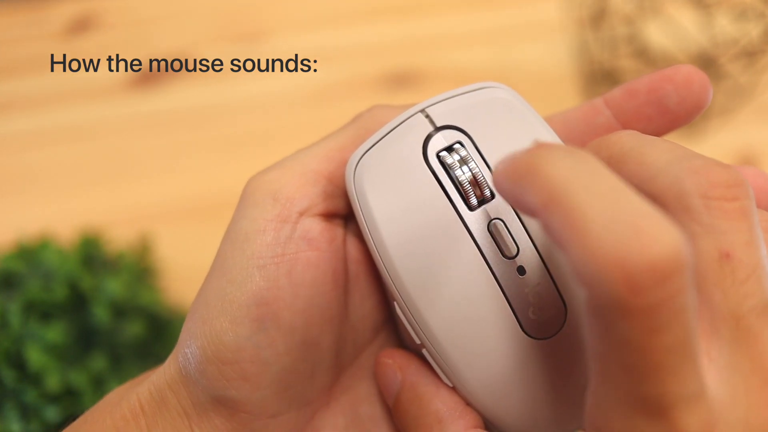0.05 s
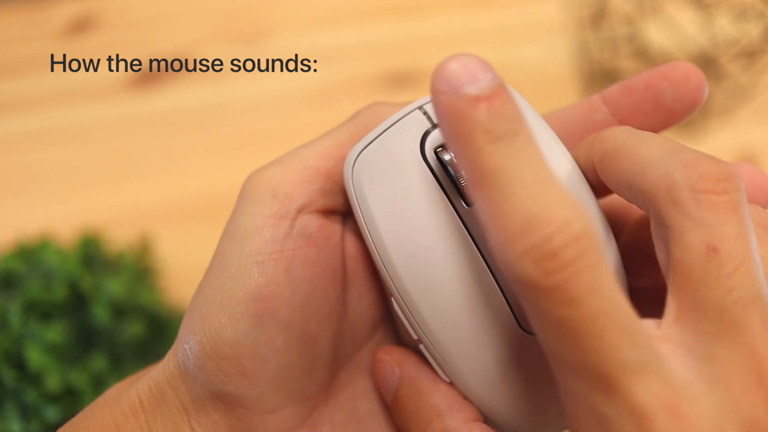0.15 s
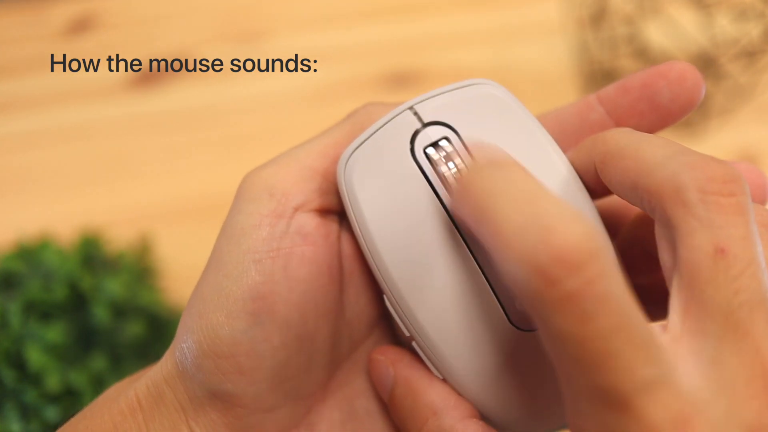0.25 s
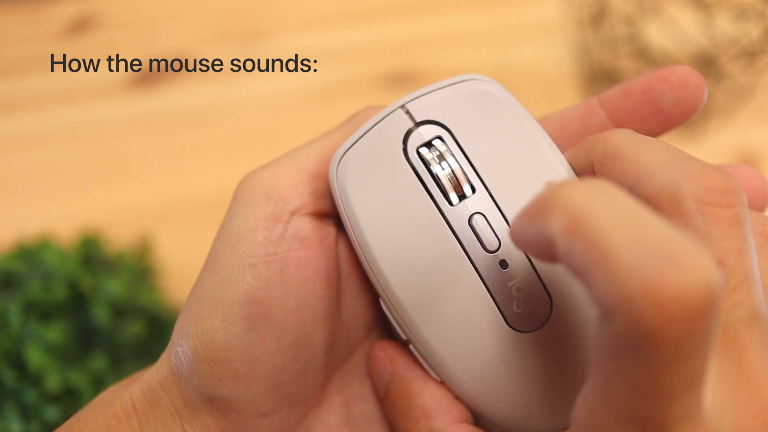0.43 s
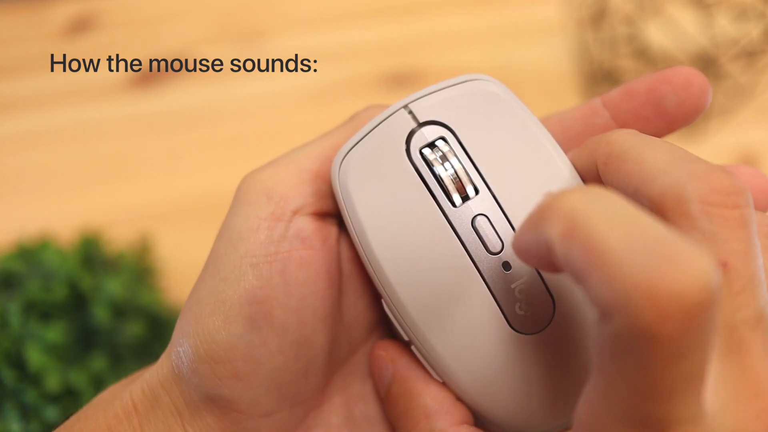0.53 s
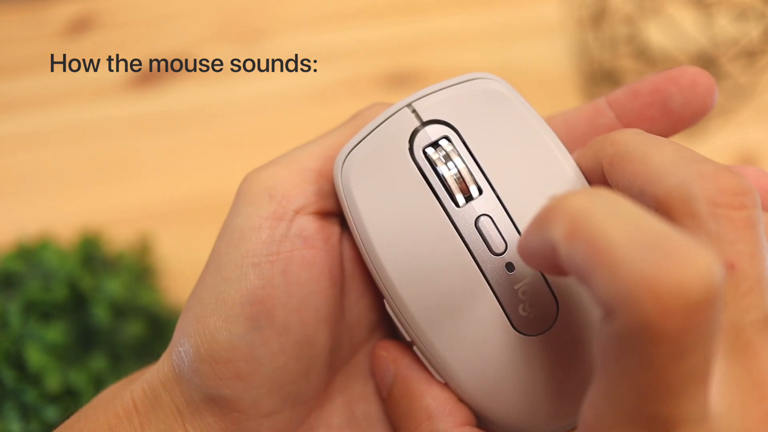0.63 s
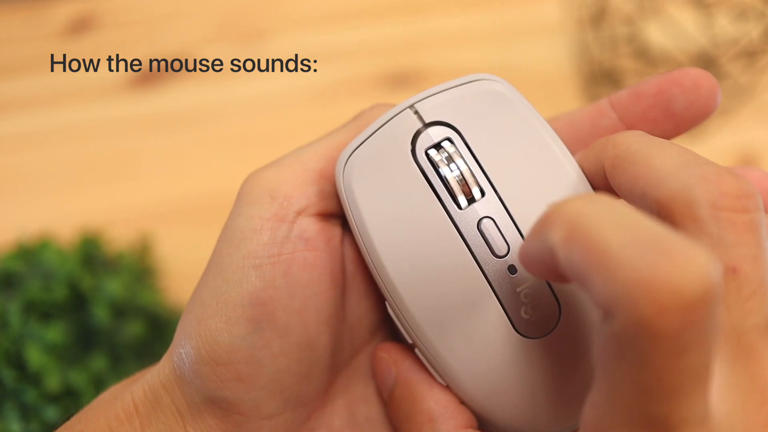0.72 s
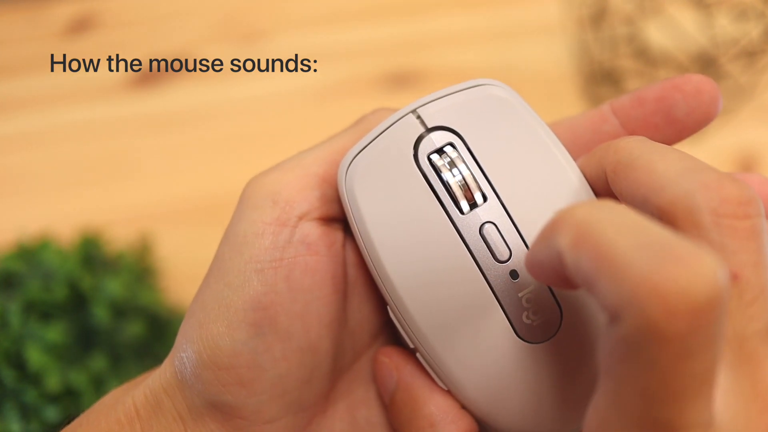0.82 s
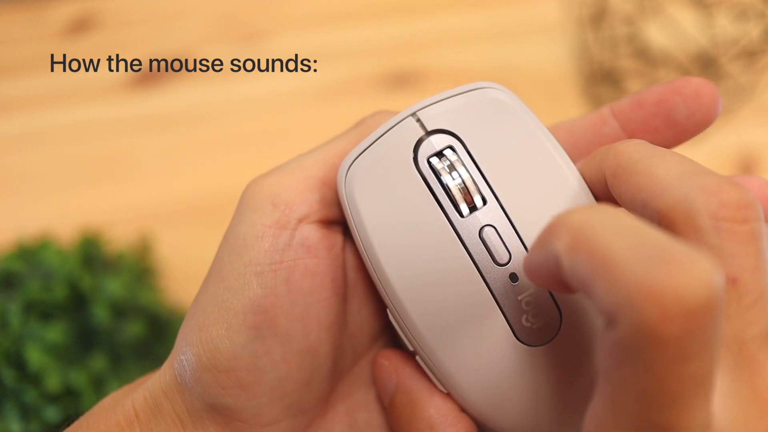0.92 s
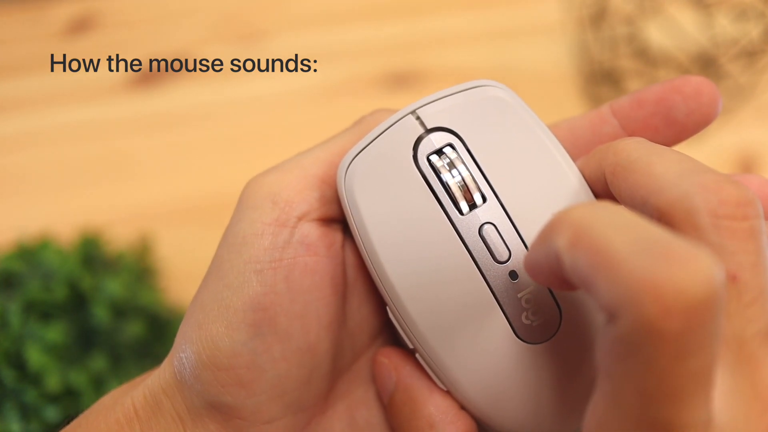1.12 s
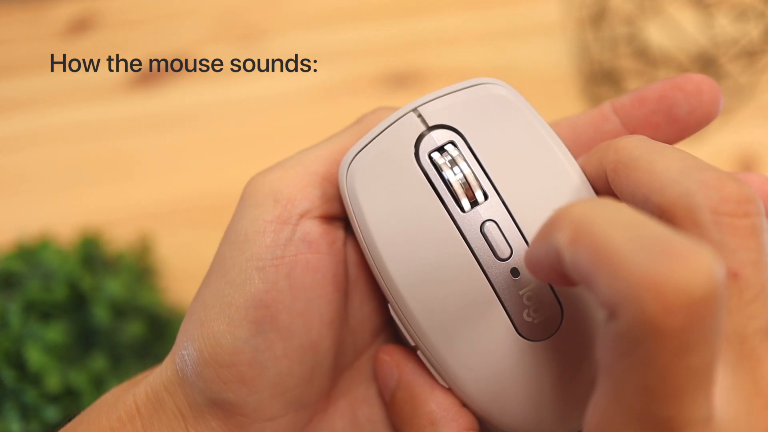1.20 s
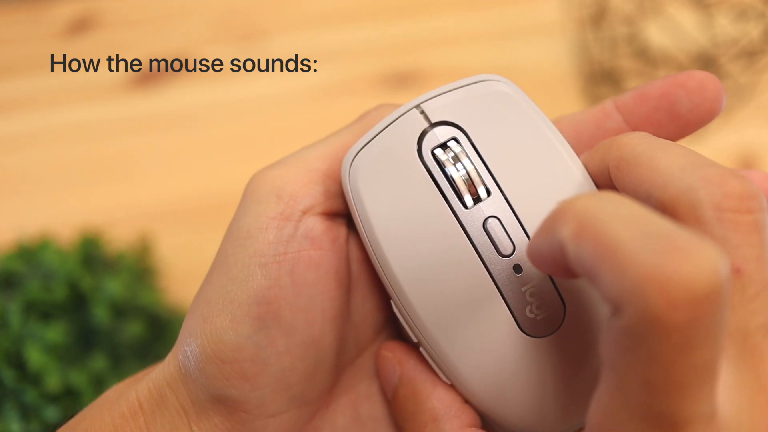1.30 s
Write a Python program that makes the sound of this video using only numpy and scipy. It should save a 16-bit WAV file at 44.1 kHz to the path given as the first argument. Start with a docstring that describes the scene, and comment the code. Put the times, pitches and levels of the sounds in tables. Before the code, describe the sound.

A computer mouse scroll wheel is flicked once, close to the microphone. At about 0.25 seconds it gives a sharp, plastic click, then another at 0.3 as it snaps free. The wheel spins on with a faint, pulsing whir that falls steadily in pitch and gets quieter at about 1.2 seconds. A faint low hum and the noise of a small, quiet room lie underneath.

```python
"""A flick of a mouse wheel

A finger flicks the metal scroll wheel of a hand-held mouse, close to the microphone in a small quiet
room. The wheel knocks in its cradle as it is pushed and again as it snaps free, ringing the plastic
shell. It spins on with a faint falling whir that throbs once a turn, over low mains hum and room noise."""
import sys
import numpy as np
from scipy import signal
from scipy.fft import rfft, irfft
from scipy.io import wavfile
from scipy.ndimage import uniform_filter1d

SR = 44100
rng = np.random.default_rng(int(sys.argv[2]) if len(sys.argv) > 2 else 0)


def waveform_to_disk(signal):
    """Save audio, clipped to [-1, 1], as 16-bit WAV at the path in sys.argv[1]."""
    frames = np.transpose(np.atleast_2d(signal))
    scaled = np.clip(frames, -1, 1) * 32767
    samples = np.round(scaled).astype(np.int16)
    wavfile.write(sys.argv[1], SR, samples)


N = 59535
T = np.arange(N) / SR
HZ = np.fft.rfftfreq(N, 1 / SR)


def from_db(db):
    """Decibels to gain."""
    return 10 ** (np.asarray(db) / 20)


def rms_one(x):
    """Scale to unit rms."""
    return x / np.sqrt(np.mean(x ** 2) + 1e-20)


def at_hz(points, hz):
    """Read a table on a log-frequency axis."""
    table_hz, value = np.transpose(points)
    return np.interp(np.log(np.maximum(hz, 1)), np.log(table_hz), value)


def noise(spectrum):
    """Steady noise of a given colour, rms 1."""
    return rms_one(irfft(rfft(rng.standard_normal(N)) * from_db(at_hz(spectrum, HZ)), N))


def drift(rate_hz):
    """Random wandering up to about this rate, rms 1."""
    return rms_one(irfft(rfft(rng.standard_normal(N)) / (1 + (HZ / rate_hz) ** 4), N))


def ramp(start_s, length_s):
    """Rise from 0 to 1."""
    return np.clip((T - start_s) / length_s, 0, 1)


def minimum_phase(gain):
    """The causal response with this gain: it rings only after the blow."""
    cepstrum = irfft(np.log(gain + 1e-6), N)
    return gain * np.exp(1j * rfft(2 * cepstrum[:N // 2], N).imag)


# The quiet room around the microphone. Each row: frequency in Hz, relative noise density in dB.
ROOM_TONE = [(20, -17.5), (40, -15), (65, 1.5), (115, 2.5), (200, -3), (300, -3), (450, -11), (900, -12),
             (1800, -15.5), (2800, -22), (6000, -26), (12000, -27.5), (16000, -29)]


def background(noise_db=-52, hum_hz=60, hum_db=-52):
    """Room noise and a slightly wavering mains hum."""
    room_tone = from_db(noise_db) * noise(ROOM_TONE)
    hum = from_db(hum_db + 1.2 * drift(5)) * np.sin(2 * np.pi * hum_hz * T)
    return room_tone + hum


def contact_chatter(contact_s, rise_s=0.00039, t60_s=0.009, smooth_hz=454):
    """Spectrum of one contact: a brief random chatter, evened out across frequency."""
    decay = from_db(-60 * np.maximum(T - contact_s, 0) / t60_s)
    force = rfft(rng.standard_normal(N) * ramp(0, rise_s) * decay)
    local_power = uniform_filter1d(np.abs(force) ** 2, int(smooth_hz * N / SR))
    return force / np.sqrt(local_power)


# The plastic shell and cradle, heard close up. Each row: frequency in Hz, peak gain in dB with the
# wheel pushed down, peak gain in dB with it sprung back, time to fade by 60 dB in seconds.
SHELL_MODES = [(724, 11, 10, .03), (874, 26, 26, 0.039), (1108, 20, 23.5, 0.047), (1337, 30.5, 26.5, 0.026),
               (1580, 23.5, 27, 0.039), (1908, 16, 25, 0.026), (2600, 19.5, 23, 0.022),
               (2890, 12, 21, 0.022), (3700, 17, 26.5, .013), (4400, 14, 5, 0.0075), (4890, 7, 17.5, 0.013),
               (5500, 19.5, 15, .011), (6170, 10, 16, 0.007), (7600, 11.5, 14, 0.0095),
               (8850, 11.5, 13, 0.0057), (10220, 8.5, 18, 0.0062), (13800, 11, 7, .006),
               (15000, 1, 7, 0.0066)]
# The even bed of short-lived modes under them. Each row: frequency in Hz, gain in dB.
MODE_BED = [(30, -3), (110, 6), (300, 6.5), (600, 7), (780, 8), (1050, 20.5), (1700, 17), (2500, 16),
            (3300, 14), (4400, 6.5), (6000, 13.5), (7100, -4.5), (12000, 3.5), (14500, 3), (16500, -16)]


def shell(place):
    """Gain of the shell at each frequency; where the wheel strikes decides which modes speak."""
    power = from_db(at_hz(MODE_BED, HZ)) ** 2
    for hz, pushed_db, sprung_db, t60_s in SHELL_MODES:
        width_hz = np.log(1000) / (np.pi * t60_s)
        peak = from_db(pushed_db * (1 - place) + sprung_db * place)
        damping = width_hz * HZ
        power += (peak * damping) ** 2 / ((HZ ** 2 - hz ** 2) ** 2 + damping ** 2)
    return np.sqrt(power)


# The wheel striking its cradle, close to the microphone. Each row: start in seconds, force level in dB,
# hardness as a treble corner in Hz, contact time in seconds, place from 0 (pushed) to 1 (sprung back).
WHEEL_KNOCKS = [(0.2354, -29, 20000, .0001, 0.85), (0.2439, -8, 3500, 0.00096, 0.73),
                (0.2473, 1, 18000, 0.00122, 0.11), (0.2881, -14, 3000, .0016, .6),
                (0.3093, -0.08, 20000, 0.00138, 1), (0.3193, -8.5, 7050, 0.00085, 0.49),
                (1.118, -39.5, 3300, .002, 0.96), (1.179, -44, 3270, .002, 1)]


def wheel_knocks():
    """Each contact rings the shell; a soft one is duller."""
    out = np.zeros(N)
    for start_s, db, hardness_hz, contact_s, place in WHEEL_KNOCKS:
        body = minimum_phase(shell(place) / np.sqrt(1 + (HZ / hardness_hz) ** 2))
        knock = irfft(contact_chatter(contact_s) * body, N)
        out += from_db(db) * np.roll(knock, int(start_s * SR))
    return out


# Skin on the knurled rim, close up. Each row: frequency in Hz, relative noise density in dB.
FINGER_RASP = [(300, -3), (1200, -2), (4000, -2), (8000, -18), (13000, -5), (16000, -18)]


def finger_drag(start_s=0.25, end_s=0.293, fade_s=0.0062, level_db=-48.5, rough_db=3):
    """Between the two main knocks the fingertip rasps on the rim, pushing the wheel up to speed."""
    gate = ramp(start_s, fade_s) * (1 - ramp(end_s, fade_s))
    return gate * from_db(level_db + rough_db * drift(230)) * noise(FINGER_RASP)


# The whir, faint even this close. Each row, one per multiple of the tooth rate: level in dB before
# the shell colours it, throb once a turn in dB, random waver in dB.
TOOTH_PARTIALS = [(-44.5, 3, 0.7), (-45, 2.5, 2), (-58.5, 7.5, 1.34), (-73, 7, 1.5), (-72, 8, -3),
                  (-78.5, 5, 0), (-73, 8, 5)]
# How well the shell radiates the whir to the microphone. Each row: frequency in Hz, gain in dB.
SHELL_RADIATION = [(318, -13.5), (332, -3), (410, -2), (560, -5), (620, -9.5), (670, -12), (706, -3),
                   (760, -11.5), (790, -1.5), (826, 1.5), (850, -9), (895, -1.5), (930, -3), (957, -11.5),
                   (995, -2.5), (1035, -7), (1062, 4.5), (1123, 6.5), (1190, 5), (1240, -3), (1310, 4.5),
                   (1750, 1.5), (2400, -8.5)]
# The axle rubbing inside the mouse. Each row: frequency in Hz, relative noise density in dB.
AXLE_RUB = [(200, -17), (700, 0.5), (1000, -1.5), (1700, -1), (2400, -18), (5000, -29)]


def wheel_whir(start_s=0.32, rise_s=0.034, teeth=24, axle_db=-63):
    """The teeth of the slowing wheel sing through the shell and the axle rubs; both swell once a turn."""
    start_hz, slowing_hz_per_s, easing_hz_per_s2 = 621, 360, 29  # friction and drag slow the teeth
    age = T - start_s
    tooth_hz = start_hz - slowing_hz_per_s * age + easing_hz_per_s2 * age ** 2
    phase = 2 * np.pi * np.cumsum(tooth_hz) / SR
    closest_s = 0.487  # a moment at which the wobbling rim passes closest
    wobble = np.cos((phase - np.interp(closest_s, T, phase)) / teeth)
    bright_db_per_octave = 5.5 * np.exp(-((T - 1.057) / 0.072) ** 2)  # the overtones brighten briefly
    out = from_db(axle_db + 2.8 * wobble) * noise(AXLE_RUB)
    for k, (db, throb_db, waver_db) in enumerate(TOOTH_PARTIALS, 1):
        bright_db = bright_db_per_octave * max(np.log2(k / 2), 0)
        level_db = db + at_hz(SHELL_RADIATION, k * tooth_hz) + bright_db
        out += from_db(level_db + throb_db * wobble + waver_db * drift(25)) * np.sin(k * phase)
    settle = from_db(-5.5 * ramp(start_s=1.19, length_s=0.013))  # the whir drops as the wheel gets slow
    return out * ramp(start_s, rise_s) * settle


# The small room's answer at the microphone. Each row: frequency in Hz, relative density in dB.
ROOM_COLOUR = [(150, -23), (600, -2.5), (1100, -1.5), (1700, -1.5), (2400, -1.5), (3100, 2), (3700, -1),
               (4400, 3), (6000, -3), (8000, -3), (10000, -9), (12000, -1.5), (16000, -9)]
# How long the room rings. Each row: frequency in Hz, time to fade by 60 dB in seconds.
ROOM_DECAY = [(200, .35), (1500, 0.45), (4000, .41), (8000, 0.33), (15000, 0.18)]


def room_reverb(direct, level_db=-21, delay_s=0.0032, build_s=0.0057):
    """The room returns a diffuse tail that dies band by band."""
    edges_hz = np.geomspace(100, 17000, 12)
    reflections = noise(ROOM_COLOUR)
    tail = np.zeros(N)
    for low, high in zip(edges_hz, edges_hz[1:]):
        bandpass = signal.butter(2, [low, high], "band", fs=SR, output="sos")
        t60_s = at_hz(ROOM_DECAY, np.sqrt(low * high))
        tail += signal.sosfiltfilt(bandpass, reflections) * from_db(-60 * T / t60_s)
    tail = rms_one(tail * ramp(delay_s, build_s)) / np.sqrt(N)  # unit energy
    return from_db(level_db) * signal.fftconvolve(direct, tail)[:N]


def scene():
    """One microphone close to the mouse, with the room well behind it."""
    mouse = wheel_knocks() + finger_drag() + wheel_whir()
    return (mouse + room_reverb(mouse) + background())[None]


def record(dry, ceiling=0.81, cutoff_hz=16200):
    """The highest peaks are rounded and the top of the treble is cut."""
    rounded = dry / (1 + (dry / ceiling) ** 4) ** (1 / 4)
    lowpass = signal.ellip(10, 0.2, 80, cutoff_hz, fs=SR, output="sos")
    return signal.sosfilt(lowpass, rounded)


dry = scene()
out = record(dry)
waveform_to_disk(out)
```